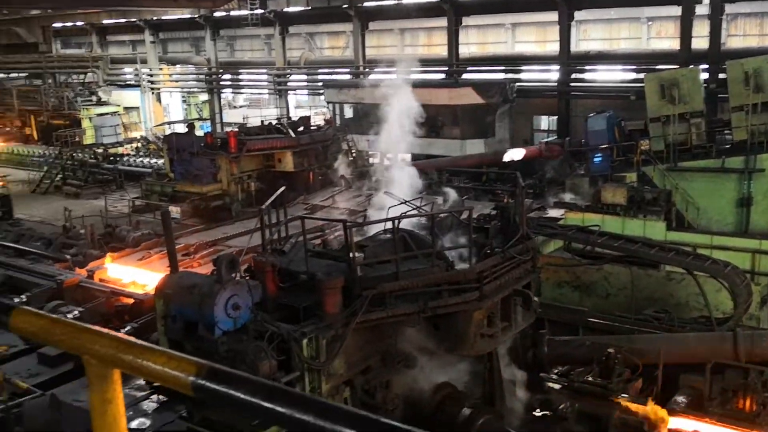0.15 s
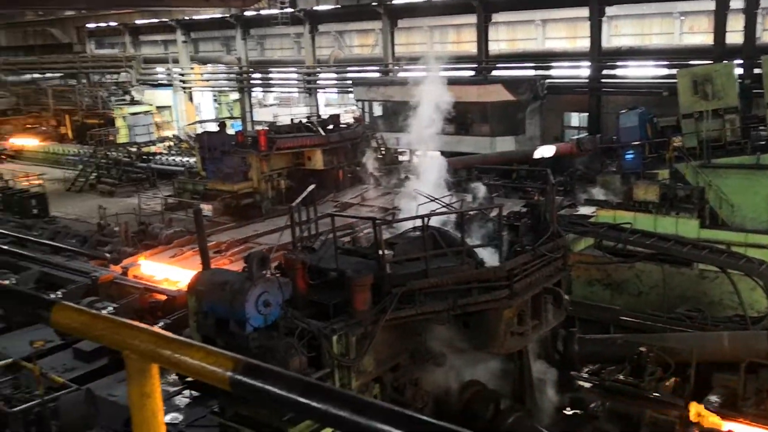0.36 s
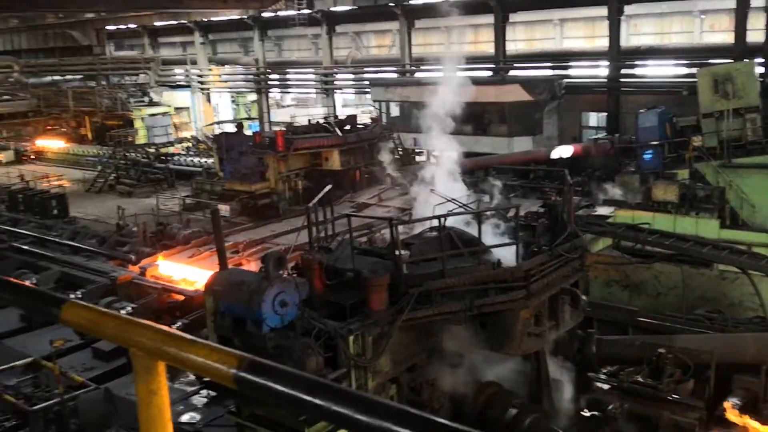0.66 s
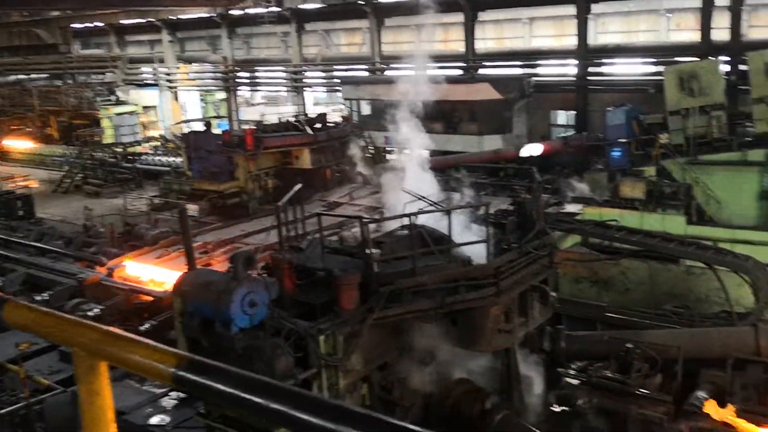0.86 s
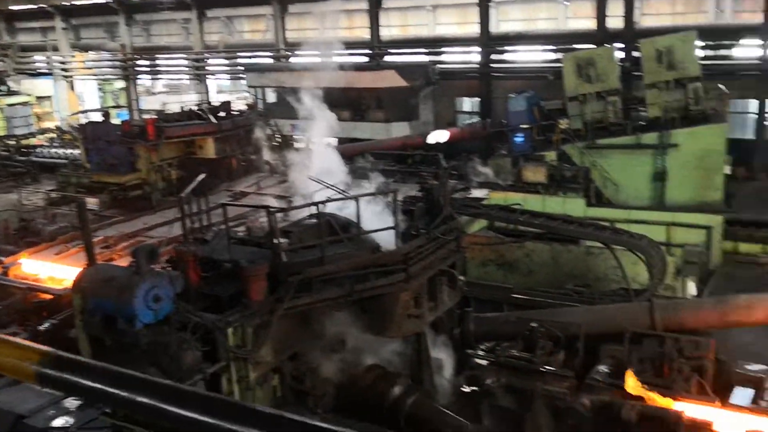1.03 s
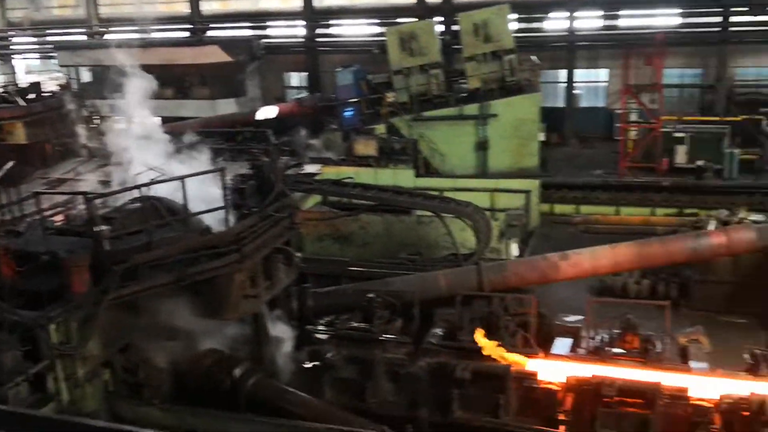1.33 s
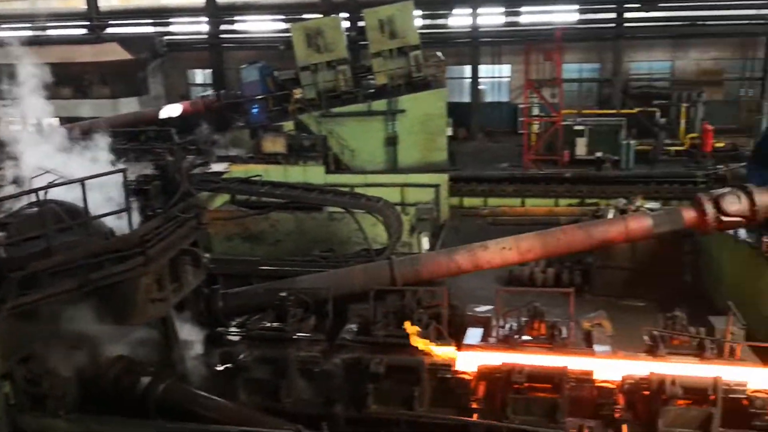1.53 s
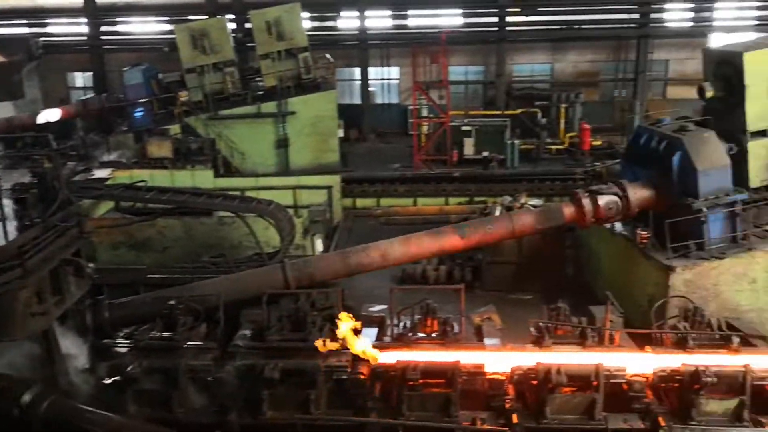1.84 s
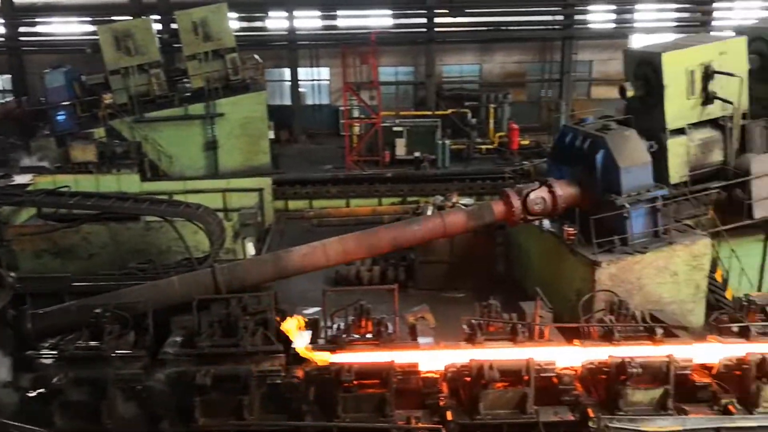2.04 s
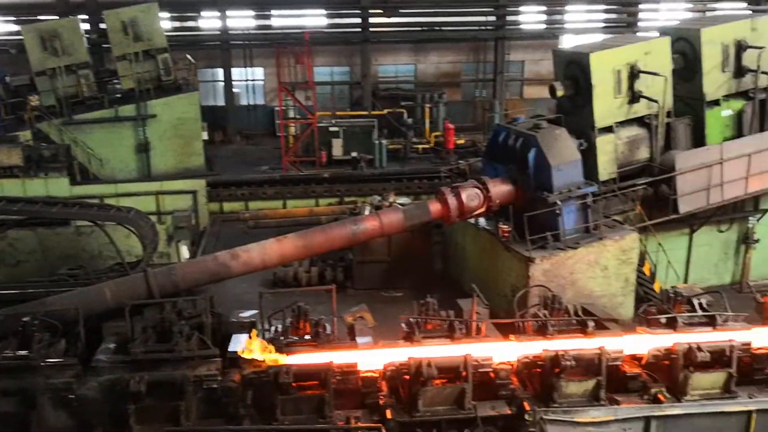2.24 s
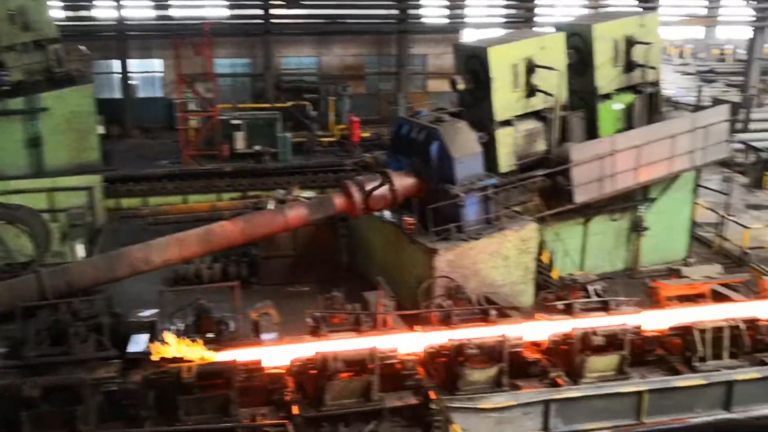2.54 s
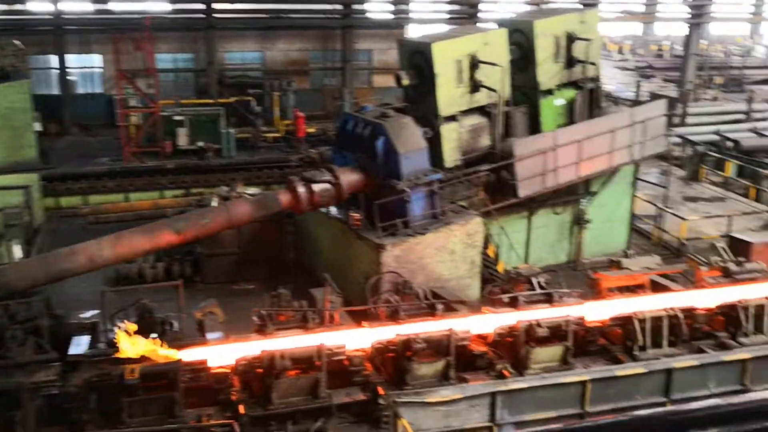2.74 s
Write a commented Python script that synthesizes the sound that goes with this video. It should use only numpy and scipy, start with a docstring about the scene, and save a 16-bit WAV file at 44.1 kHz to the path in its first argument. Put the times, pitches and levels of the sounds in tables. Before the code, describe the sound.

Heavy rolling machinery roars and rumbles steadily in a huge factory hall while hot metal scrapes and rings

```python
"""Hot rolling mill in a steel hall

A hot rolling mill runs steadily in a huge hall, heard from a walkway with the stands to the right.
The drives boom and rumble as shaped noise while motors and gears hum as wavering sines; water hisses off hot steel.
The rolls roar as noise. The bar scrapes and squeals, and its random knocks ring the rollers and guides.
Two spaced microphones pick it up, the left one quieter and later over most of the range."""
import sys
import numpy as np
from scipy import signal
from scipy.fft import rfft, irfft
from scipy.io import wavfile

SR = 44100
rng = np.random.default_rng(int(sys.argv[2]) if len(sys.argv) > 2 else 0)


def wav_record(signal):
    """Record a signal, one row per channel, as 16-bit PCM in the file named by sys.argv[1]."""
    frames = np.transpose(np.atleast_2d(signal))
    bounded = np.clip(frames, -1, 1)
    # unit amplitude maps onto the largest positive 16-bit level
    quanta = np.round(bounded * 32767).astype(np.int16)
    wavfile.write(sys.argv[1], SR, quanta)


N = 127008  # samples, 2.88 s
TIME = np.arange(N) / SR  # seconds
HZ = np.maximum(np.arange(N // 2 + 1) * SR / N, 1)  # kept above 0 for the logarithm


def from_db(db):
    """Turn decibels into gain."""
    return 10 ** (np.asarray(db) / 20)


def rms_one(x):
    """Scale to rms 1."""
    return x / np.sqrt(np.mean(x ** 2) + 1e-20)


def by_hz(rows):
    """Read the columns of a table at every frequency, along a logarithmic pitch scale."""
    hz, *columns = np.transpose(rows)
    return [np.interp(np.log(HZ), np.log(hz), column) for column in columns]


def level_curve(rows):
    """Turn (seconds, dB) points into a gain over time."""
    return from_db(np.interp(TIME, *np.transpose(rows)))


def swing(rows):
    """Turn (seconds, dB) points into a gain about their mean level in dB."""
    db = np.interp(TIME, *np.transpose(rows))
    return from_db(db - db.mean())


def drift(rate_hz):
    """Wander at random with spread 1, mostly slower than the given rate."""
    noise = rfft(rng.standard_normal(N))
    return rms_one(irfft(noise / (1 + (HZ / rate_hz) ** 2), N))


def colour(x, spectrum):
    """Give a white signal of rms 1 a spectrum, with steep skirts beyond the table's ends."""
    db, = by_hz(spectrum)
    low_skirt = np.minimum(HZ / spectrum[0][0], 1) ** 4
    high_skirt = np.minimum(spectrum[-1][0] / HZ, 1) ** 4
    per_hz = np.sqrt(SR / 2)  # the white power is spread over SR / 2 Hz
    return irfft(rfft(x) * from_db(db) * low_skirt * high_skirt * per_hz, N)


def churn(spectrum, patchy_db, rate_hz):
    """Make two unrelated noises whose octaves each swell and sink, in step at both points."""
    white = rfft(rng.standard_normal((2, N)))
    octave = np.floor(np.log2(np.clip(HZ, spectrum[0][0], spectrum[-1][0])))
    out = 0
    for k in np.unique(octave):
        band = irfft(white * (octave == k), N)
        out = out + band * from_db(patchy_db * drift(rate_hz))
    return colour(rms_one(out), spectrum)


def tone(hz, wander_hz, rate_hz):
    """Make a sine of rms 1 whose pitch wanders, separately at each of two points."""
    pitch = hz + wander_hz * np.array([drift(rate_hz), drift(rate_hz)])
    turns = np.cumsum(pitch, axis=1) / SR + rng.random((2, 1))
    return np.sqrt(2) * np.sin(2 * np.pi * turns)


def resonance(hz, width_hz):
    """Give the response of one ringing mode, 1 at its peak."""
    return 1 / (1 + 1j * (HZ ** 2 - hz ** 2) / (HZ * width_hz))


# Spectrum of the deep boom. Each row: frequency in Hz, level in dB per Hz.
BOOM_SPECTRUM = [(20, -73), (33, -69), (50, -58.5), (70, -56.5), (95, -54), (130, -75)]
# How the boom comes and goes. Each row: time in seconds, level in dB, used about its mean.
BOOM_SWING = [(0, -10), (.08, 6), (.22, -2), (.38, -4), (.5, 5), (.9, 3), (1.12, 3.5), (1.33, -3), (1.5, 0),
              (1.72, 1), (1.9, 4), (2.2, -8), (2.35, 2), (2.5, 4), (2.6, 0), (2.88, -2)]


def boom():
    """Deep noise from the drives that comes and goes."""
    return swing(BOOM_SWING) * churn(BOOM_SPECTRUM, patchy_db=.5, rate_hz=7.2)


# Spectrum of the low rumble. Each row: frequency in Hz, level in dB per Hz.
RUMBLE_SPECTRUM = [(70, -62), (100, -52), (150, -47), (210, -46.5), (300, -48), (400, -51.5), (550, -57),
                   (900, -91)]
# How the rumble sways. Each row: time in seconds, level in dB, used about its mean.
RUMBLE_SWING = [(0, 1.5), (.2, 2.2), (.29, -2), (.39, 4.5), (.47, -0.5), (.6, 3), (.76, 1.5), (.92, 1.2),
                (1.18, -0.2), (1.42, .8), (1.6, 2), (1.8, 0.5), (2.13, -1.5), (2.33, -0.5), (2.5, 0),
                (2.88, -1.7)]


def rumble():
    """Low noise from the drives, swaying in level."""
    return swing(RUMBLE_SWING) * churn(RUMBLE_SPECTRUM, patchy_db=0.16, rate_hz=5.3)


# Motor tones and weaker gear tones. Each row: pitch in Hz, middle level in dB.
HUM_TONES = [(98, -39.5), (143, -40), (435, -42), (521, -40), (588.5, -37.5)]
HUM_SWING_DB, HUM_WANDER_HZ = 2.5, 1.23


def hum():
    """Motors and gears turn at nearly steady rates, giving sines that waver in level and pitch."""
    out = 0
    for hz, db in HUM_TONES:
        level = from_db(db + HUM_SWING_DB * drift(2.2))
        out = out + level * tone(hz, HUM_WANDER_HZ, rate_hz=5.9)
    return out


LOW_GEAR_HZ, HIGH_GEAR_HZ = 173.1, 291.4
# Surges of the low gear tone. Each row: time in seconds, level in dB rms.
LOW_GEAR_SURGES = [(0, -29), (.16, -34.5), (.33, -39), (.39, -27), (.48, -41), (.62, -35), (.77, -33),
                   (.88, -28.5), (1.02, -37), (1.14, -32), (1.25, -51), (1.32, -26), (1.4, -22),
                   (1.49, -38), (1.56, -23), (1.66, -35), (1.73, -32), (1.83, -50), (1.89, -29),
                   (2.04, -32.5), (2.2, -40), (2.65, -36), (2.73, -27.5), (2.79, -33.5), (2.88, -27)]
# Surges one octave above it. Each row: time in seconds, level in dB rms.
OCTAVE_SURGES = [(0, -42), (.06, -25.5), (.17, -39), (.8, -45), (1.1, -30), (1.33, -42), (1.6, -37),
                 (1.8, -40), (2.3, -32), (2.6, -33.5), (2.88, -35.5)]
# Surges of the high gear tone. Each row: time in seconds, level in dB rms.
HIGH_GEAR_SURGES = [(0, -46), (.2, -38), (.32, -24), (.56, -29.5), (.8, -51), (1.25, -32), (1.48, -27),
                    (1.83, -38), (1.92, -23.5), (2.0, -36.5), (2.31, -33), (2.5, -30.5), (2.88, -32.5)]


def gears():
    """The strongest gear tones are wandering sines that surge with the load."""
    low = level_curve(LOW_GEAR_SURGES) * tone(LOW_GEAR_HZ, 1.62, rate_hz=10.0)
    octave = level_curve(OCTAVE_SURGES) * tone(2 * LOW_GEAR_HZ, 1.7, rate_hz=5.2)
    high = level_curve(HIGH_GEAR_SURGES) * tone(HIGH_GEAR_HZ, 4.05, rate_hz=11.6)
    return low + octave + high


# Spectrum of the hiss. Each row: frequency in Hz, level in dB per Hz.
STEAM_SPECTRUM = [(2500, -80), (4500, -69), (5400, -71), (6300, -69.5), (7000, -67.5), (7550, -63.5),
                  (8000, -66), (8400, -78), (8900, -80.5), (9600, -130), (10600, -86), (15000, -92)]
# How the hiss sways. Each row: time in seconds, level in dB, used about its mean.
STEAM_SWING = [(0, 0.3), (.25, 0.6), (.45, 2.3), (1.05, 2.2), (1.27, -1), (1.55, 0.8), (2.25, -0.2),
               (2.43, -0.8), (2.58, 0.8), (2.77, -1.5), (2.88, 0)]


def steam():
    """Cooling water flashes to steam on the hot bar; the hiss has a narrow, whistling crest."""
    return swing(STEAM_SWING) * churn(STEAM_SPECTRUM, patchy_db=0.54, rate_hz=25)


# Spectrum of the roar. Each row: frequency in Hz, level in dB per Hz.
ROLLS_SPECTRUM = [(250, -59), (400, -53), (520, -53.5), (700, -49), (900, -49), (1100, -51), (1350, -54),
                  (1800, -63), (3000, -113)]
# How the roar sways. Each row: time in seconds, level in dB, used about its mean.
ROLLS_SWING = [(0, -2), (.25, -2), (.42, -2.5), (.58, -2), (.82, -0.5), (1.14, 1.5), (1.38, .6),
               (1.53, 1.3), (1.72, .5), (1.85, 2.3), (2.03, 0), (2.2, 1.5), (2.4, 0), (2.58, 0.5),
               (2.88, 1.3)]


def rolls():
    """The rolling stands roar as broad noise."""
    return swing(ROLLS_SWING) * churn(ROLLS_SPECTRUM, patchy_db=.5, rate_hz=6.5)


def swell(middle_s, length_s):
    """Rise and fall smoothly about a moment."""
    return np.cos(np.pi * np.clip((TIME - middle_s) / length_s, -.5, .5)) ** 2


# Rough scrapes of the bar. Each row: middle in seconds, length in seconds, pitch in Hz,
# width of the resonance in Hz, level in dB before the swell.
BAR_SCRAPES = [(0.074, 0.21, 1480, 380, -19.5), (0.112, 0.14, 1830, 520, -20), (0.01, 0.09, 1790, 300, -22),
               (1.22, 0.14, 2330, 450, -28.5), (2.04, 0.15, 3220, 1500, -28.5),
               (2.177, 0.34, 1730, 300, -22.5), (2.337, 0.17, 2560, 450, -19),
               (2.355, 0.11, 2110, 200, -26), (2.412, 0.07, 2620, 150, -20)]


def scrapes():
    """Irregular slipping of the bar excites a broad resonance of the guides."""
    out = 0
    for middle_s, length_s, hz, width_hz, db in BAR_SCRAPES:
        slips = rfft(rng.standard_normal((2, N)))
        rough = rms_one(irfft(slips * resonance(hz, width_hz) ** 2, N))
        out = out + from_db(db) * swell(middle_s, length_s) * rough
    return out


SQUEAL_ATTACK_S, SQUEAL_T60_S, SQUEAL_FLUTTER_DB = 0.0053, 0.35, 2  # T60: time to fall 60 dB
SQUEAL_WANDER = 0.0019  # share of the pitch
# Squeals of the bar in the guides. Each row: start in seconds, length in seconds, pitch in Hz,
# level in dB while held.
BAR_SQUEALS = [(.138, 0.032, 2874, -25), (0.145, 0.058, 2345, -23.5), (0.234, .07, 2880, -26.5),
               (0.517, 0.043, 5400, -38), (0.543, 0.026, 5430, -35), (1.168, .038, 2335, -19),
               (1.175, 0.023, 2925, -23), (1.187, 0.03, 2110, -24), (1.236, 0.023, 2536, -22),
               (1.293, .04, 2080, -25), (1.558, 0.14, 1234, -33), (1.682, 0.037, 2340, -23),
               (2.318, .042, 2086, -20.5)]


def squeals():
    """Rough stick-slip tones: each catches quickly, then rings out, fluttering throughout."""
    out = 0
    for start_s, length_s, hz, db in BAR_SQUEALS:
        rise = np.clip((TIME - start_s) / SQUEAL_ATTACK_S, 0, 1)
        fall = from_db(-60 * np.maximum(TIME - start_s - length_s, 0) / SQUEAL_T60_S)
        flutter = rms_one(from_db(SQUEAL_FLUTTER_DB * drift(90)))
        voice = tone(hz, SQUEAL_WANDER * hz, rate_hz=81)
        out = out + from_db(db) * rise * fall * flutter * voice
    return out


HALL_T60_S, HALL_DB = 1.6, 4.5  # time to fall 60 dB; tail against the direct sound


def hall(x):
    """Add a long diffuse tail, different at two points and already running at the start."""
    tails = rng.standard_normal((2, N)) * from_db(-60 * TIME / HALL_T60_S)
    tails /= np.sqrt(np.sum(tails ** 2, axis=1, keepdims=True))
    response = 1 + from_db(HALL_DB) * rfft(tails)
    response[1] -= 1  # the second point gets only the tail
    return irfft(rfft(x) * response, N)  # wraps around, so the end's tail carries into the start


KNOCKS_PER_S, KNOCK_SPREAD_DB = 260, 4


def knocks():
    """Random blows of uneven strength, smeared by the hall; rms 1 at each point."""
    strength = from_db(KNOCK_SPREAD_DB * np.minimum(rng.exponential(1, N), 4))
    signed = strength * rng.choice([-1, 1], N)
    blows = signed * (rng.random(N) < KNOCKS_PER_S / SR)
    return np.array([rms_one(point) for point in hall(blows)])


# Spectrum of the grinding and knocking. Each row: frequency in Hz, level in dB per Hz.
GRIND_SPECTRUM = [(900, -66.5), (1350, -57.5), (1700, -50), (2100, -49), (2550, -48.5), (2850, -51.5),
                  (3100, -56), (3900, -60), (4600, -67.5), (6000, -80), (8000, -119)]
# How the bar's noise sways. Each row: time in seconds, level in dB, used about its mean.
BAR_SWING = [(0, -0.7), (.15, -0.54), (.5, -0.059), (1.1, -0.12), (1.21, 0.093), (1.42, -0.4), (1.7, 0.63),
             (1.83, -.5), (1.97, .7), (2.33, 0.49), (2.88, -0.34)]
# Ringing of the rollers and guides. Each row: pitch in Hz, width in Hz, level in dB before the sway.
RINGING_MODES = [(807, 7.6, -51), (954, 7.5, -40), (1077, 3.9, -42.5), (1212, 4.9, -41), (1594, 3.4, -53),
                 (1840, 11, -87), (1780, 5, -73), (2074, 13, -36), (2342, 5, -38.5), (2536, 8.9, -50),
                 (2885, 4.2, -54), (3420, 10, -59), (7480, 37, -77)]
RATTLE_DB = -6.5  # knocks against the smooth grinding


def bar():
    """The bar grinds and knocks along the rollers and guides, which ring with their modes."""
    blows = rfft(knocks())
    ringing = 0
    for hz, width_hz, db in RINGING_MODES:
        ringing = ringing + from_db(db) * rms_one(irfft(blows * resonance(hz, width_hz), N))
    rattle = from_db(RATTLE_DB) * colour(knocks(), GRIND_SPECTRUM)
    grinding = churn(GRIND_SPECTRUM, patchy_db=.5, rate_hz=87)
    return swing(BAR_SWING) * (grinding + rattle + ringing)


# How the two microphones differ. Each row: frequency in Hz, likeness from 0 to 1,
# lag of the left one in ms, left minus right level in dB.
MICROPHONE_PAIR = [(60, 0.97, 0.3, 0), (170, 0.97, 0.33, -0.2), (292, 1, 0.54, -2.5),
                   (514, 0.89, 0.66, -5.5), (890, 0.42, 0.78, -6.5), (1360, 0.38, 0.69, -7.5),
                   (2300, 0.54, 0.63, -12), (3220, 0.17, 0.61, -11.5), (4630, 0.23, 0.566, -7),
                   (6230, 0.3, 0.54, -6), (7700, 0.1, 0.66, -5.5), (8800, 1, 0.23, -26),
                   (10800, 0.4, 0.481, -2)]


def microphones(pair):
    """The left port is shaded and late; how much it shares with the right varies with pitch."""
    likeness, lag_ms, shade_db = by_hz(MICROPHONE_PAIR)
    likeness = np.clip(likeness, 0, 1)
    shared, own = rfft(pair)
    late = np.exp(-2j * np.pi * HZ * lag_ms / 1000)
    mix = likeness * late * shared + np.sqrt(1 - likeness ** 2) * own
    left = from_db(shade_db) * mix
    return np.array([irfft(left, N), pair[0]])


def scene():
    """The whole mill at the two microphones."""
    drives = boom() + rumble() + hum() + gears()
    return microphones(drives + steam() + rolls() + scrapes() + squeals() + bar())


CUTOFF_HZ = 15150


def record(dry):
    """A steep low-pass filter cuts the top."""
    low_pass = signal.ellip(12, .1, 70, CUTOFF_HZ, fs=SR, output="sos")
    return signal.sosfilt(low_pass, dry)


dry = scene()
out = record(dry)
wav_record(out)
```